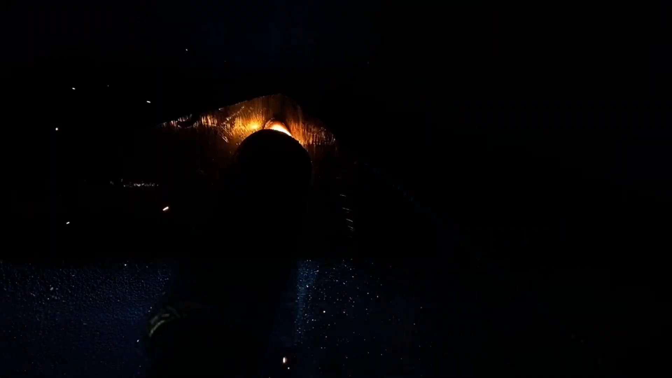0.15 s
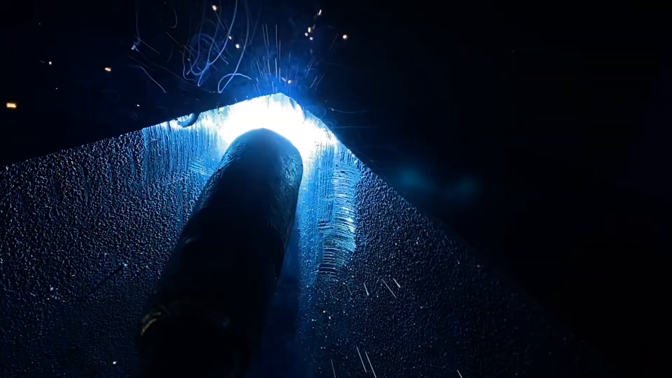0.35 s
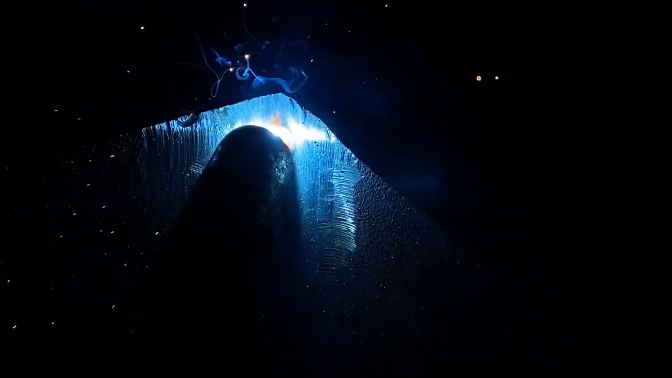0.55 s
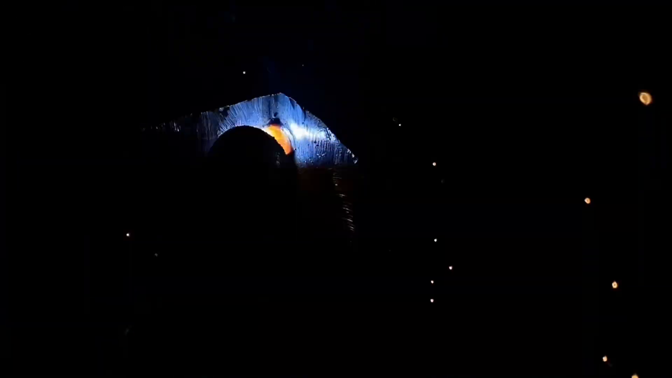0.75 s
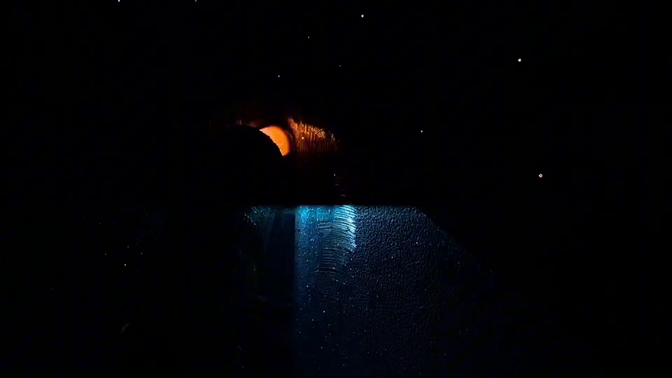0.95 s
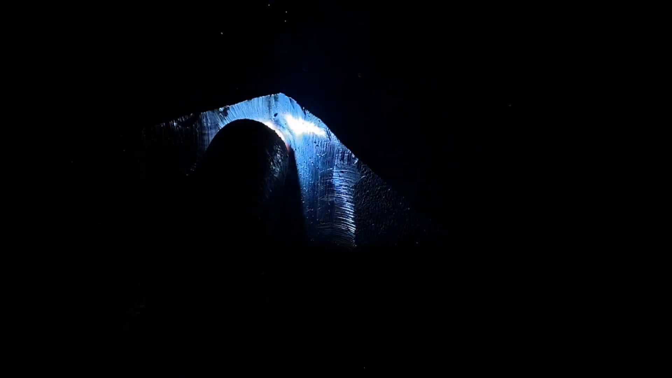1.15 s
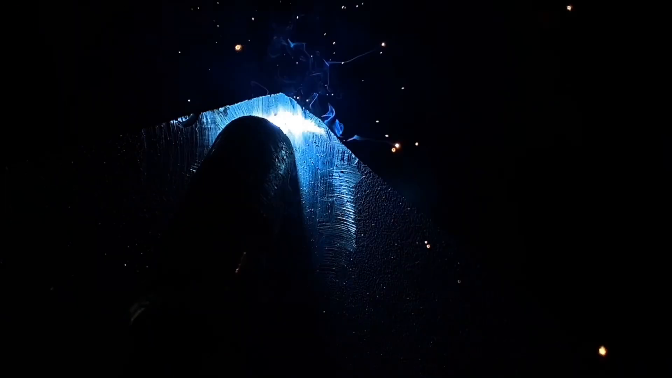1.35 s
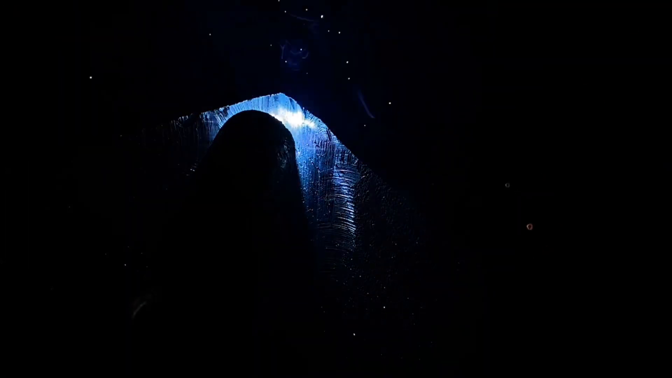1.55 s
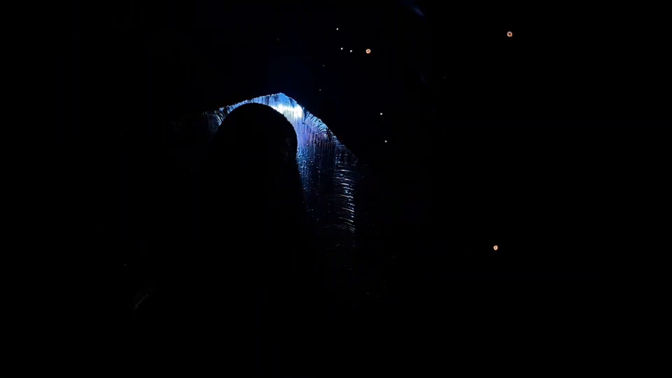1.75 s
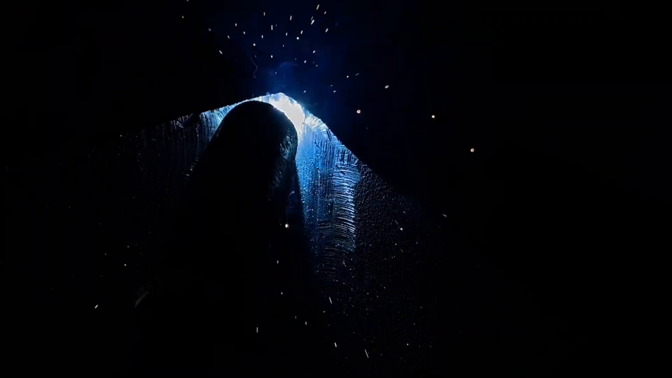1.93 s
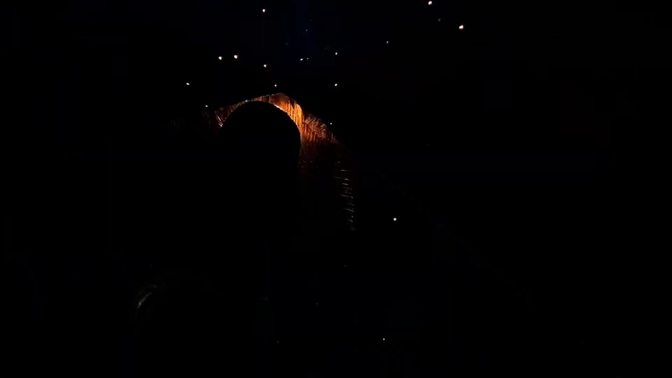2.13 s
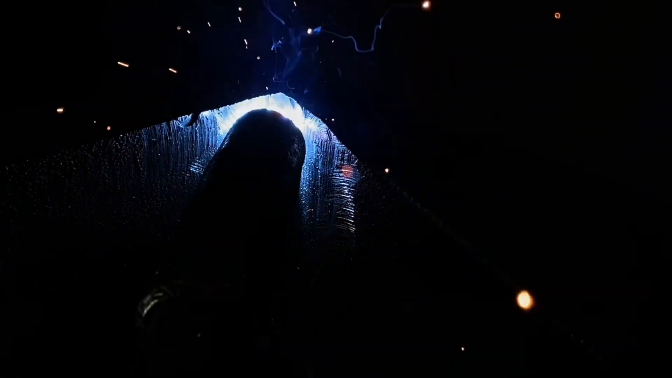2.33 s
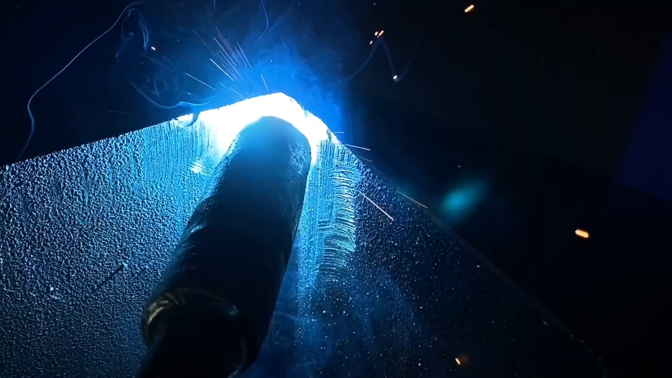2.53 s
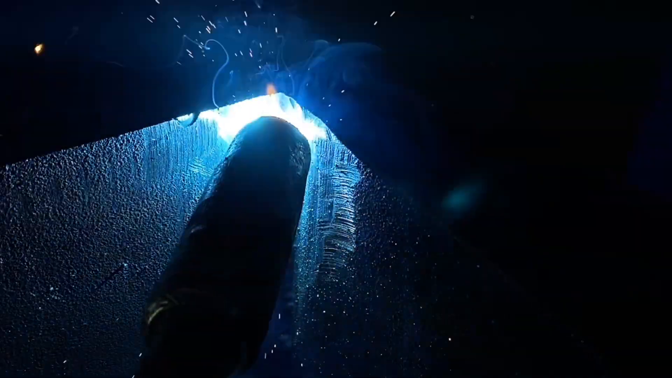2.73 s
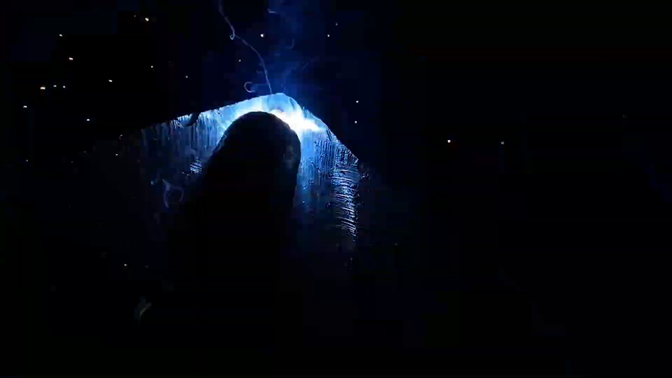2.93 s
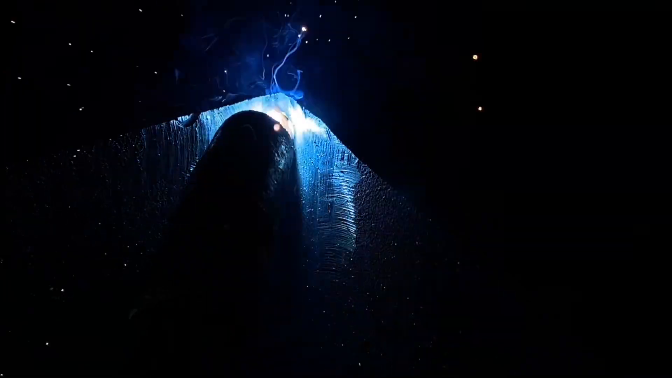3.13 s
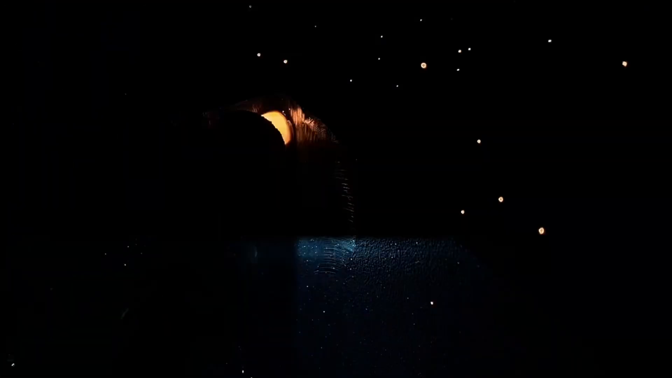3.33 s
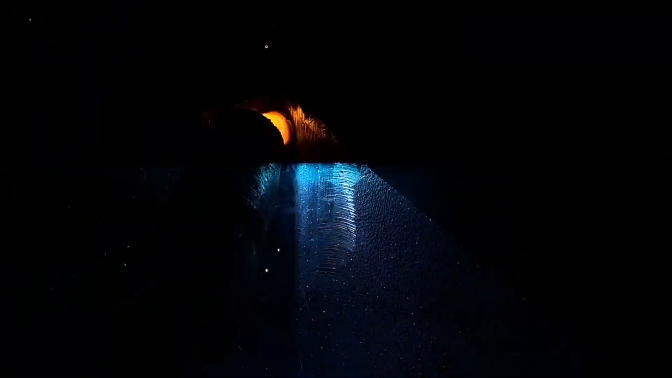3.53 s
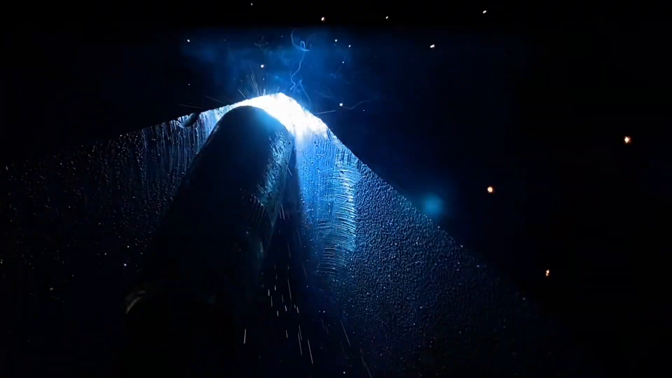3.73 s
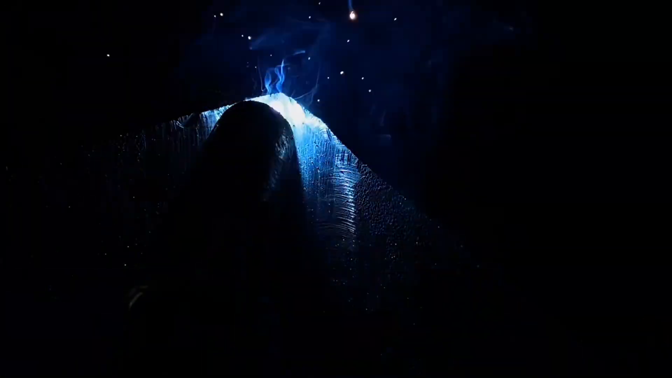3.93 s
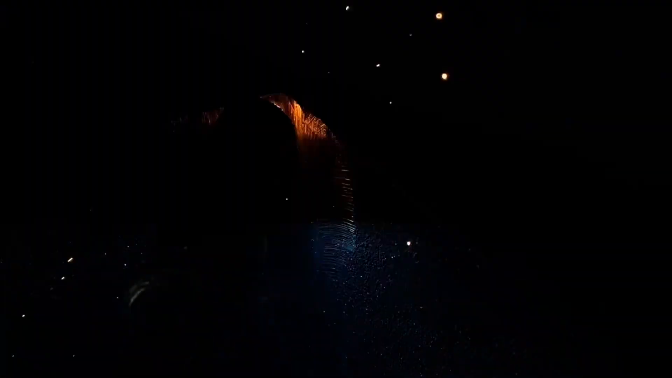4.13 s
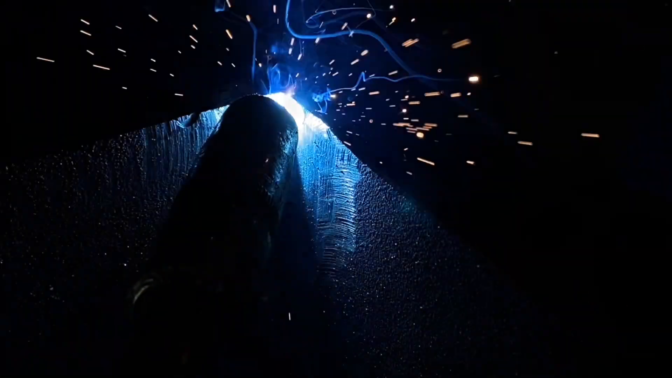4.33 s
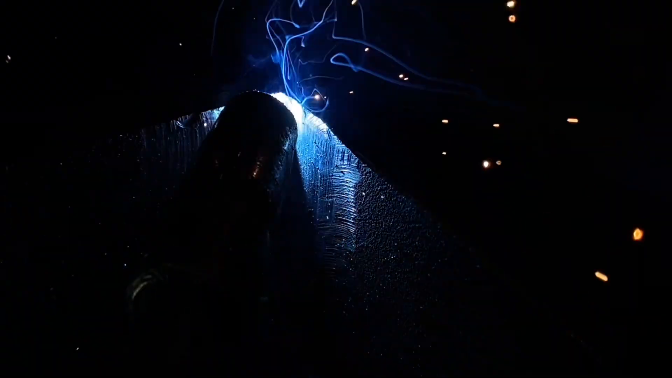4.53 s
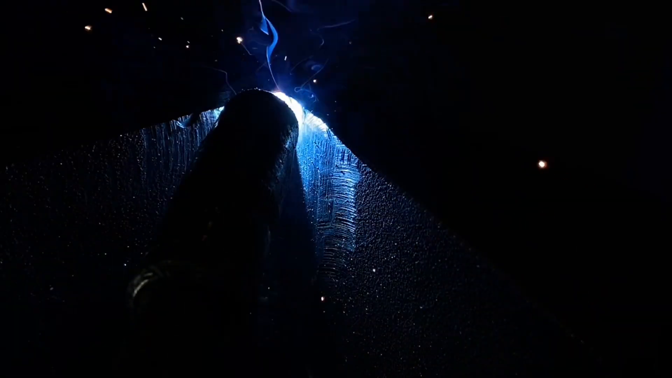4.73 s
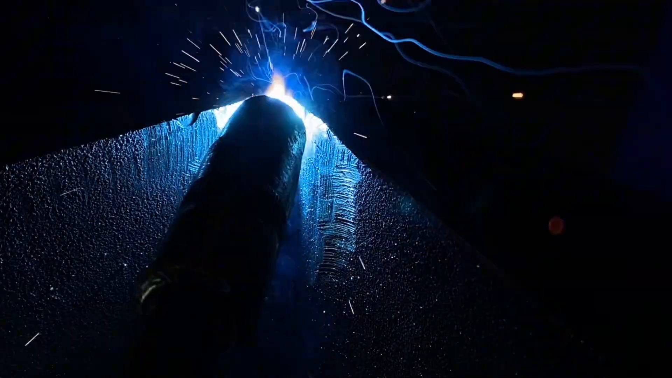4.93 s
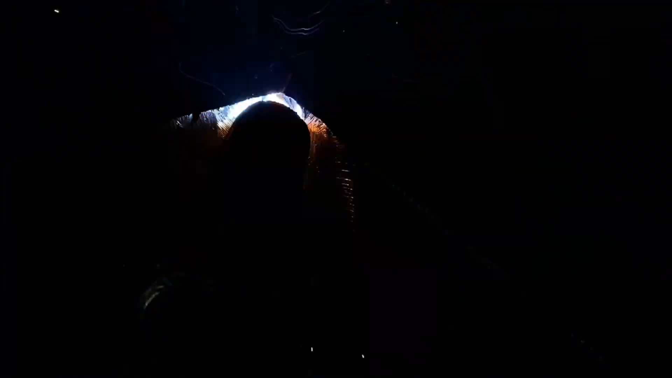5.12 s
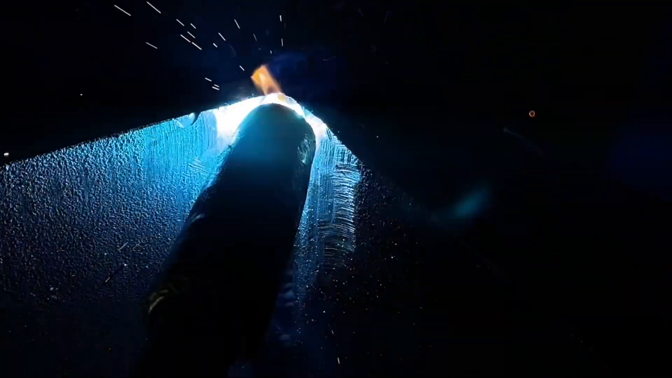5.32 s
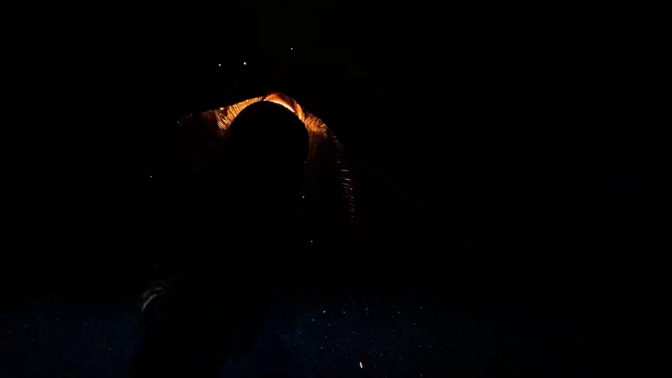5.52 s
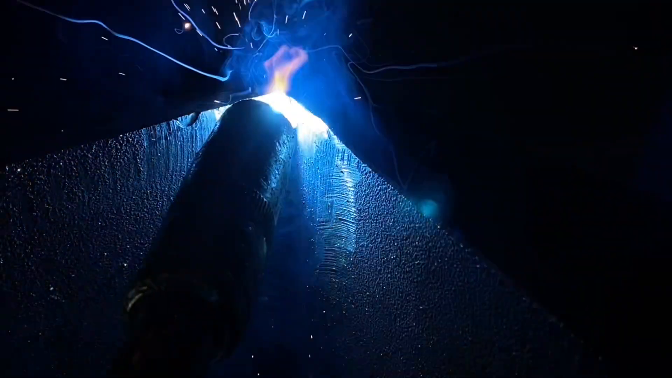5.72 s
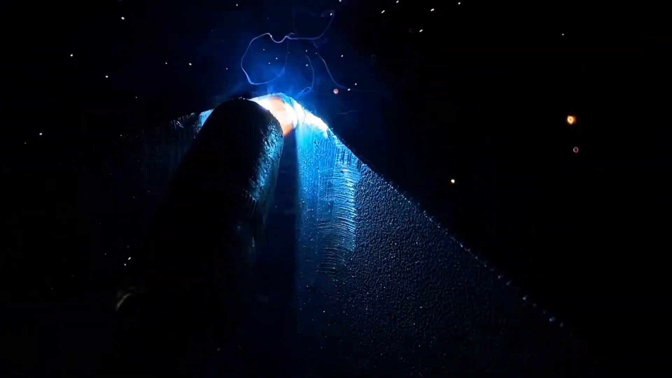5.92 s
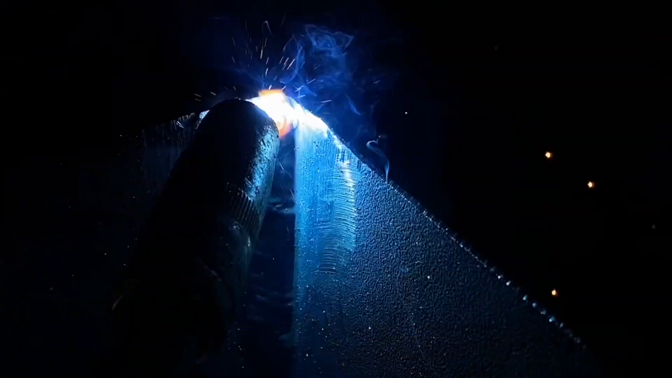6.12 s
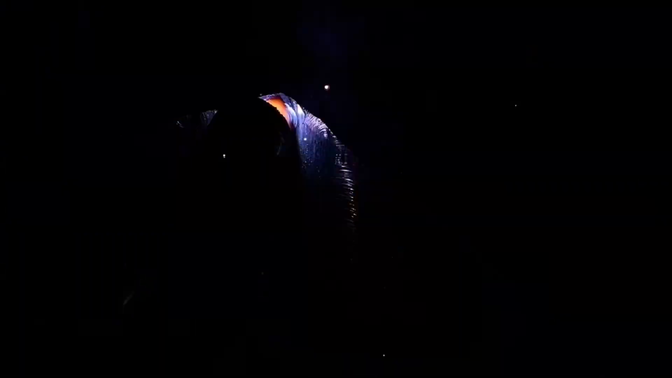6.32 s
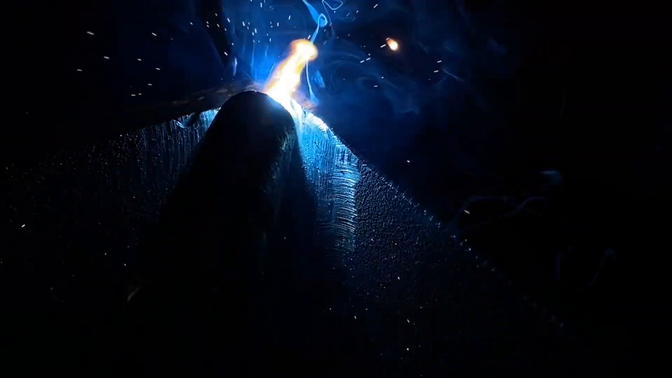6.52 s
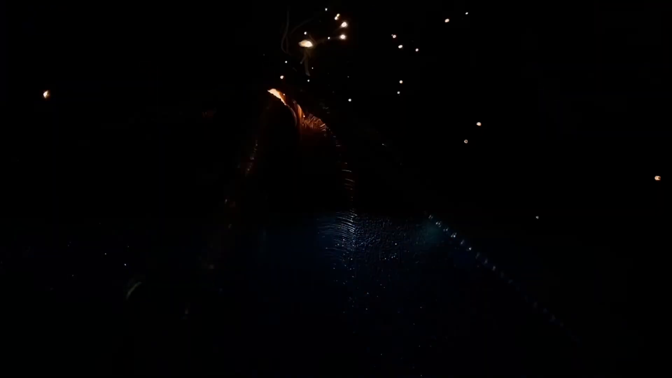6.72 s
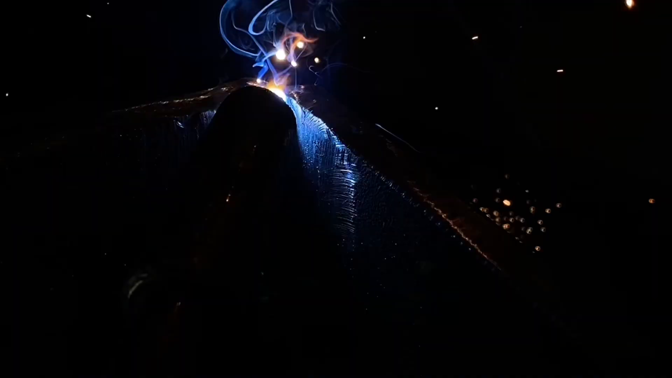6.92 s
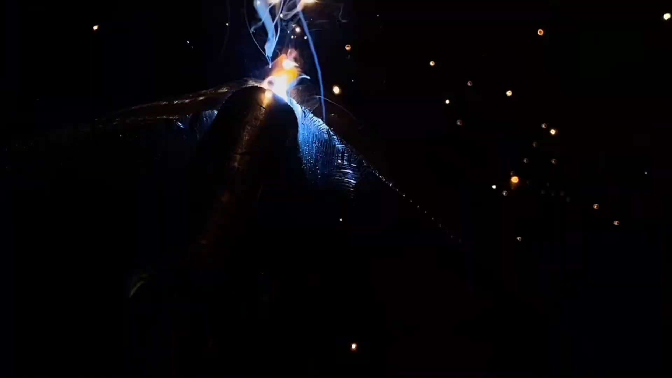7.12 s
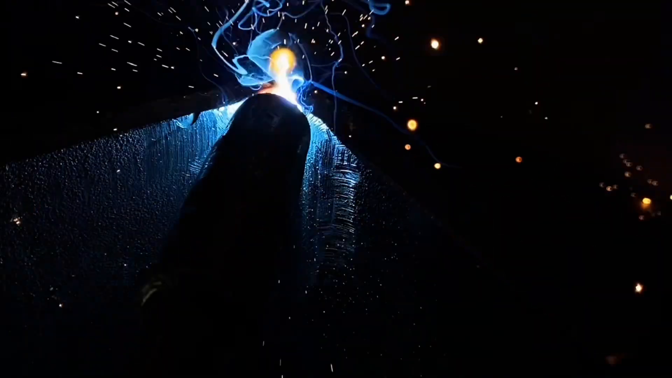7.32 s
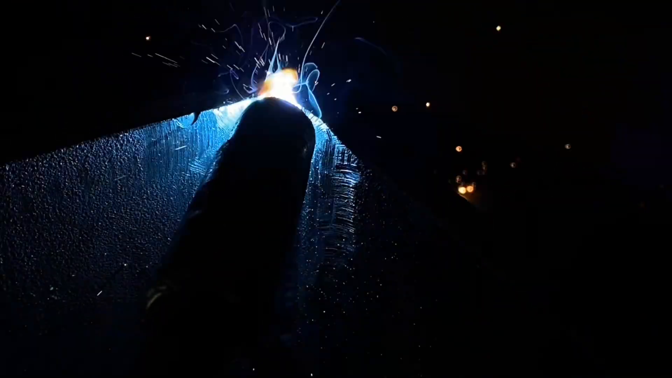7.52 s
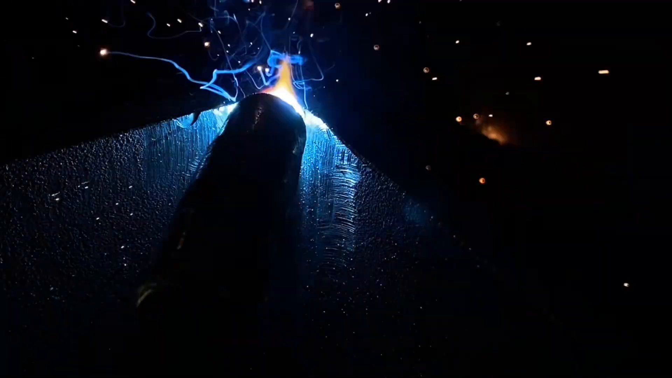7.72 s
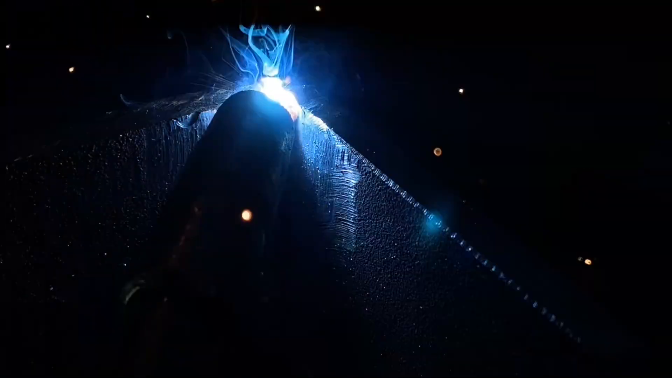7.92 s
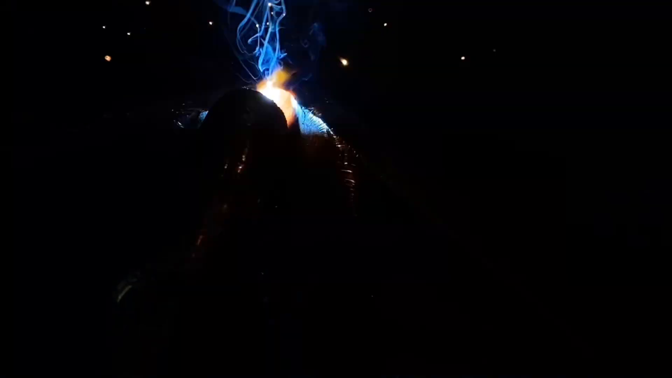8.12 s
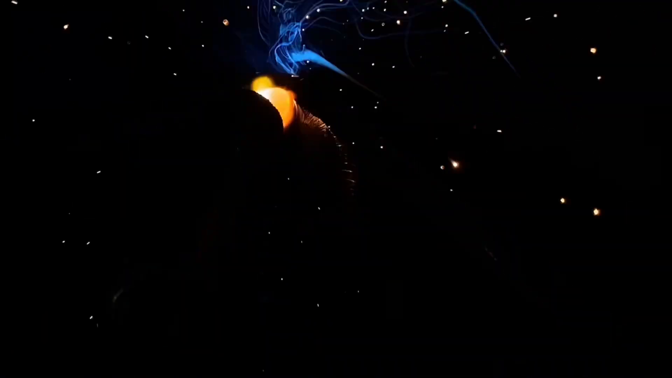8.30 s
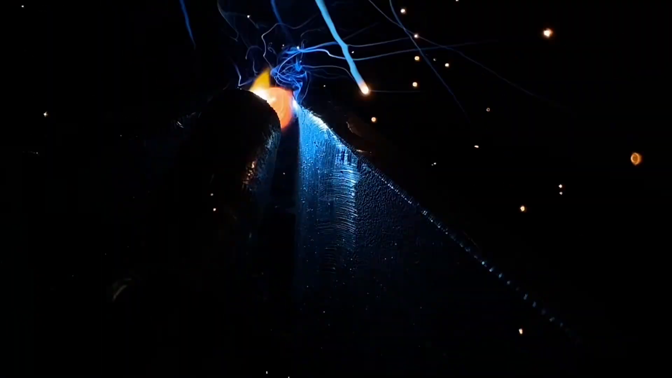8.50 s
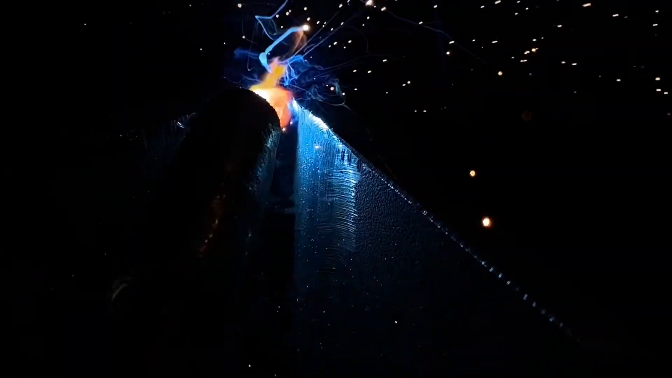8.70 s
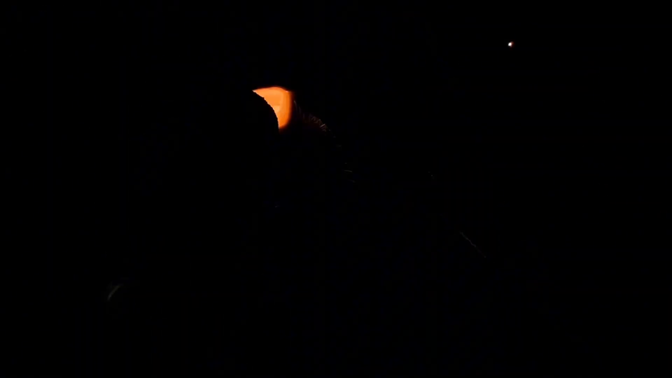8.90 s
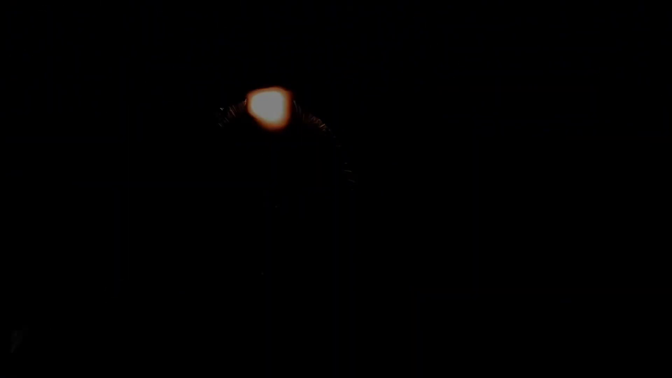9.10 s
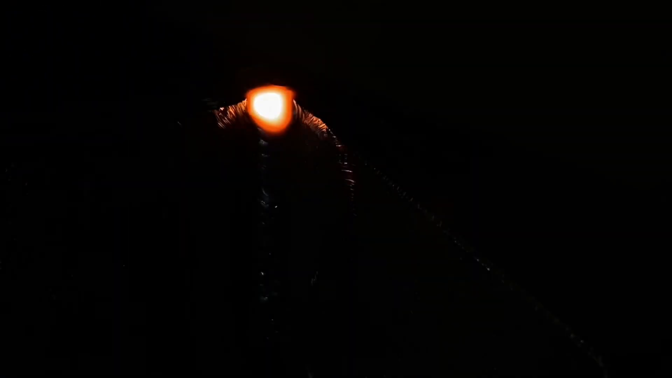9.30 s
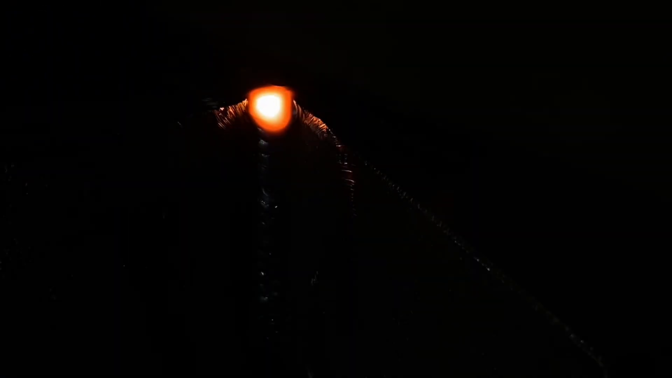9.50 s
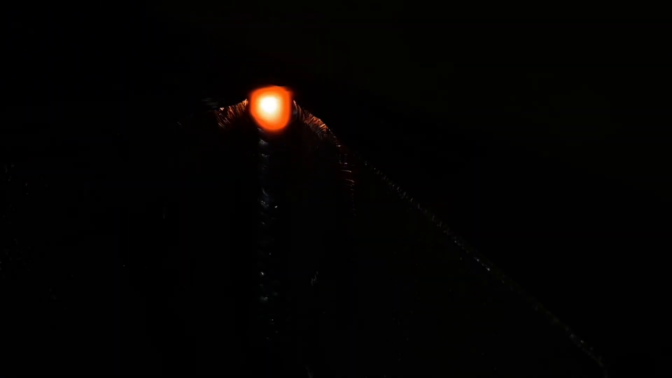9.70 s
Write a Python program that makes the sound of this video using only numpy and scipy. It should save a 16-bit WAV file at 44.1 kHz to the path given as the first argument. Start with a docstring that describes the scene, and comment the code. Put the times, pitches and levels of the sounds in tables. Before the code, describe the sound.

Close, steady crackling and hissing of wire-feed welding on steel, stopping suddenly near the end and leaving a faint workshop hum.

```python
"""Wire-feed welding on a steel joint, close by. About 65 times a second the wire shorts into the pool and the arc
strikes again with a sharp pop; between pops it sizzles. Nearby steel returns quick echoes, the workshop a short tail.
The arc drops out once, then stops with a last pop, leaving the murmur of the shop. A small stereo microphone pair."""
import sys
import numpy as np
from scipy import signal
from scipy.fft import rfft, irfft, next_fast_len
from scipy.io import wavfile

SR = 44100
rng = np.random.default_rng(int(sys.argv[2]) if len(sys.argv) > 2 else 0)


def store_pcm(level_fs):
    """Save levels as 16-bit WAV."""
    pcm = np.round(np.clip(level_fs, -1, 1) * 32767).astype(np.int16)
    wavfile.write(sys.argv[1], SR, np.atleast_2d(pcm).T)


N = 429975

# the arc striking again: (s, peak dB)
POPS = [(0.0129, -27.5), (0.0239, -30.2), (0.0366, -31.1), (0.0498, -29.2), (0.0676, -24.7), (0.0815, -30.2),
        (0.0945, -32.9), (0.0987, -24.5), (0.1116, -32.1), (0.124, -31.2), (0.1544, -30.0), (0.1761, -30.1),
        (0.1874, -26.6), (0.1946, -30.1), (0.2084, -28.7), (0.2216, -31.4), (0.2389, -28.5), (0.2446, -31.6),
        (0.2527, -24.6), (0.2713, -32.1), (0.2752, -18.7), (0.2915, -31.7), (0.3012, -27.0), (0.3068, -26.0),
        (0.3117, -27.6), (0.3234, -23.9), (0.333, -24.7), (0.3543, -30.2), (0.3662, -28.8), (0.3769, -24.6),
        (0.3883, -20.8), (0.3995, -21.6), (0.4311, -25.2), (0.4378, -23.6), (0.4504, -23.5), (0.4679, -24.4),
        (0.4751, -26.5), (0.4873, -20.9), (0.5066, -25.7), (0.5256, -18.8), (0.539, -24.0), (0.5482, -26.7),
        (0.5641, -25.9), (0.5754, -24.7), (0.5913, -27.9), (0.5965, -24.2), (0.602, -29.7), (0.6078, -24.3),
        (0.6206, -24.2), (0.6342, -25.3), (0.6378, -31.7), (0.6483, -24.2), (0.6661, -27.7), (0.68, -23.3),
        (0.6951, -25.1), (0.7064, -23.4), (0.7105, -25.2), (0.7225, -23.2), (0.7346, -24.3), (0.7551, -22.5),
        (0.7708, -23.5), (0.7751, -23.8), (0.7834, -23.9), (0.7992, -26.6), (0.8061, -25.2), (0.8183, -24.5),
        (0.8337, -24.9), (0.842, -31.7), (0.8476, -25.2), (0.8613, -24.0), (0.8737, -22.2), (0.8773, -27.1),
        (0.8882, -23.2), (0.9005, -25.4), (0.9149, -23.3), (0.9248, -27.9), (0.9321, -24.2), (0.9469, -24.5),
        (0.9582, -26.7), (0.9691, -21.7), (0.9867, -24.7), (0.9981, -23.8), (1.0017, -22.1), (1.0209, -25.5),
        (1.0362, -23.4), (1.0542, -22.1), (1.0714, -26.4), (1.0886, -22.6), (1.1054, -24.9), (1.122, -24.1),
        (1.1384, -22.1), (1.1541, -23.4), (1.1713, -26.5), (1.1866, -24.2), (1.2018, -25.3), (1.218, -24.7),
        (1.2337, -24.9), (1.2496, -26.7), (1.2656, -24.7), (1.282, -25.9), (1.2972, -26.3), (1.3138, -24.8),
        (1.3297, -23.4), (1.3453, -26.1), (1.3617, -28.5), (1.3778, -25.2), (1.394, -25.2), (1.4104, -25.1),
        (1.4266, -25.3), (1.4426, -25.7), (1.4583, -26.6), (1.4758, -22.2), (1.492, -28.0), (1.5093, -24.6),
        (1.5253, -25.9), (1.5418, -21.7), (1.5579, -25.0), (1.5749, -25.2), (1.5917, -25.7), (1.6076, -25.4),
        (1.6252, -24.4), (1.6417, -27.4), (1.658, -28.6), (1.674, -28.0), (1.6908, -28.5), (1.7068, -27.5),
        (1.7241, -30.0), (1.7398, -27.7), (1.7565, -26.4), (1.7727, -27.4), (1.7893, -30.0), (1.8058, -28.7),
        (1.8215, -30.2), (1.8378, -29.3), (1.8532, -31.0), (1.8686, -29.4), (1.8852, -28.4), (1.8999, -30.4),
        (1.9148, -27.6), (1.9309, -28.6), (1.9466, -26.9), (1.9649, -27.6), (1.9804, -29.1), (1.9961, -26.2),
        (2.0113, -25.6), (2.0272, -27.3), (2.0442, -29.8), (2.0615, -28.8), (2.0768, -27.7), (2.0928, -28.3),
        (2.1082, -29.8), (2.1241, -27.9), (2.1398, -28.7), (2.1556, -26.1), (2.1714, -26.8), (2.1878, -27.0),
        (2.2046, -25.0), (2.2205, -27.1), (2.2365, -29.1), (2.2511, -27.3), (2.2641, -26.2), (2.2762, -26.1),
        (2.2901, -24.2), (2.3035, -26.5), (2.3234, -28.4), (2.3392, -28.7), (2.3565, -26.9), (2.3723, -26.8),
        (2.391, -28.8), (2.4068, -25.3), (2.4246, -26.8), (2.4405, -24.6), (2.4497, -23.1), (2.4589, -25.5),
        (2.4696, -24.9), (2.478, -24.8), (2.4898, -24.6), (2.507, -28.0), (2.5232, -30.4), (2.54, -27.2),
        (2.5572, -24.6), (2.568, -24.5), (2.5822, -30.8), (2.5919, -31.4), (2.5959, -24.4), (2.6148, -23.0),
        (2.6297, -24.1), (2.6417, -30.7), (2.6571, -31.1), (2.6676, -27.5), (2.6782, -22.2), (2.6859, -24.6),
        (2.6897, -23.4), (2.7049, -25.3), (2.7205, -31.7), (2.7362, -29.7), (2.7522, -24.1), (2.7662, -31.6),
        (2.7832, -28.8), (2.8003, -28.6), (2.8165, -33.1), (2.831, -29.7), (2.8468, -26.9), (2.8601, -25.7),
        (2.8733, -24.4), (2.8857, -24.7), (2.9093, -23.3), (2.9241, -25.7), (2.9349, -23.8), (2.9394, -23.9),
        (2.9584, -27.1), (2.9739, -27.5), (2.9832, -27.4), (2.9918, -20.9), (3.0107, -22.8), (3.0281, -24.0),
        (3.0475, -21.4), (3.0613, -21.7), (3.0768, -24.6), (3.0852, -23.6), (3.09, -25.2), (3.1007, -23.2),
        (3.1143, -23.5), (3.1301, -24.8), (3.1499, -22.5), (3.1633, -24.6), (3.1778, -27.1), (3.1838, -25.6),
        (3.1924, -23.4), (3.1975, -21.4), (3.207, -23.5), (3.2109, -23.7), (3.2257, -23.4), (3.2416, -25.6),
        (3.2558, -26.6), (3.2593, -22.5), (3.2747, -24.8), (3.289, -25.0), (3.3066, -27.6), (3.3198, -25.4),
        (3.3332, -26.1), (3.3446, -25.0), (3.357, -24.6), (3.3714, -25.3), (3.3855, -23.1), (3.4001, -24.6),
        (3.4038, -23.2), (3.4148, -24.0), (3.4282, -24.2), (3.4422, -22.3), (3.4468, -23.6), (3.456, -23.2),
        (3.4696, -24.4), (3.4856, -23.8), (3.49, -27.3), (3.5059, -24.8), (3.5228, -25.9), (3.5376, -27.6),
        (3.552, -24.4), (3.5581, -26.6), (3.571, -22.9), (3.5778, -23.9), (3.5979, -24.6), (3.6112, -24.2),
        (3.6176, -25.6), (3.6378, -16.3), (3.659, -23.7), (3.6761, -21.0), (3.6902, -27.7), (3.7016, -20.2),
        (3.7149, -25.6), (3.7291, -26.0), (3.7429, -23.5), (3.7572, -25.8), (3.7702, -22.3), (3.775, -20.1),
        (3.7909, -21.2), (3.7989, -26.6), (3.803, -25.1), (3.8188, -20.1), (3.8375, -21.8), (3.8537, -21.9),
        (3.872, -22.9), (3.8886, -24.1), (3.9046, -27.2), (3.9198, -28.2), (3.9327, -27.1), (3.9478, -29.9),
        (3.961, -26.9), (3.9775, -25.7), (3.9936, -28.0), (4.0105, -24.9), (4.0293, -25.7), (4.0465, -25.3),
        (4.0654, -27.2), (4.0717, -20.9), (4.0907, -25.7), (4.1033, -26.7), (4.1207, -30.0), (4.1273, -28.1),
        (4.1344, -21.4), (4.143, -22.6), (4.1579, -24.8), (4.172, -27.0), (4.1914, -26.7), (4.2069, -29.9),
        (4.2226, -27.3), (4.2307, -27.8), (4.2439, -26.8), (4.259, -27.0), (4.2806, -24.8), (4.2956, -25.9),
        (4.3157, -26.5), (4.331, -25.0), (4.351, -26.9), (4.3666, -24.8), (4.3868, -21.1), (4.402, -28.2),
        (4.4207, -26.1), (4.4363, -26.6), (4.4549, -27.8), (4.4712, -26.9), (4.4893, -26.6), (4.5062, -24.7),
        (4.5236, -24.9), (4.5412, -27.4), (4.5584, -26.4), (4.5762, -27.3), (4.5933, -25.3), (4.6116, -28.0),
        (4.6277, -27.8), (4.6455, -28.2), (4.662, -27.4), (4.6789, -27.8), (4.6956, -27.0), (4.7119, -28.2),
        (4.728, -28.6), (4.7438, -31.1), (4.7608, -26.3), (4.778, -27.0), (4.7954, -27.5), (4.8126, -27.0),
        (4.8299, -24.1), (4.8471, -24.8), (4.8547, -31.8), (4.8623, -27.1), (4.8738, -25.2), (4.8818, -27.6),
        (4.8874, -23.4), (4.9004, -22.4), (4.9165, -24.0), (4.9369, -23.1), (4.9541, -24.6), (4.9688, -26.1),
        (4.9847, -25.6), (5.0022, -25.4), (5.0222, -19.1), (5.0422, -23.7), (5.0612, -25.4), (5.0776, -23.8),
        (5.0938, -25.7), (5.111, -26.9), (5.1267, -25.2), (5.1409, -23.5), (5.151, -26.0), (5.1645, -24.4),
        (5.1772, -22.9), (5.1952, -21.1), (5.2098, -23.6), (5.2254, -29.4), (5.2321, -24.5), (5.2454, -25.6),
        (5.2581, -25.9), (5.263, -23.5), (5.2752, -27.1), (5.2866, -32.4), (5.2914, -30.2), (5.307, -29.4),
        (5.3182, -28.0), (5.3351, -30.2), (5.3387, -21.1), (5.3495, -30.3), (5.3531, -30.6), (5.3651, -29.8),
        (5.3789, -28.5), (5.392, -26.9), (5.4061, -28.6), (5.4189, -29.3), (5.4237, -26.3), (5.4344, -32.2),
        (5.4642, -27.7), (5.482, -31.0), (5.4972, -33.0), (5.5022, -25.0), (5.5198, -22.8), (5.5252, -31.6),
        (5.5411, -28.3), (5.5576, -25.6), (5.5694, -24.8), (5.5829, -25.7), (5.5871, -24.3), (5.5966, -20.9),
        (5.6114, -22.8), (5.6266, -17.7), (5.6424, -23.4), (5.6613, -19.2), (5.6826, -22.2), (5.7032, -22.5),
        (5.7121, -30.4), (5.7184, -27.1), (5.723, -25.4), (5.7346, -26.0), (5.7539, -23.1), (5.767, -21.5),
        (5.7846, -21.8), (5.7893, -30.3), (5.7966, -21.9), (5.8156, -22.8), (5.8214, -27.4), (5.8344, -23.1),
        (5.8509, -27.5), (5.8657, -26.9), (5.8811, -27.6), (5.8938, -27.5), (5.9056, -28.2), (5.9188, -26.1),
        (5.9312, -26.7), (5.9434, -24.6), (5.957, -29.0), (5.9718, -27.8), (5.9854, -26.3), (5.998, -26.0),
        (6.0068, -26.2), (6.0104, -28.7), (6.0247, -26.7), (6.0382, -26.5), (6.0499, -25.2), (6.0599, -27.9),
        (6.0744, -22.4), (6.0827, -30.5), (6.093, -24.7), (6.0974, -26.8), (6.1115, -23.1), (6.1251, -27.9),
        (6.1382, -23.0), (6.1437, -21.4), (6.1619, -22.6), (6.1759, -28.7), (6.1805, -27.0), (6.1923, -24.3),
        (6.2093, -26.5), (6.2161, -24.0), (6.2226, -25.0), (6.2342, -25.8), (6.2524, -21.2), (6.2581, -24.6),
        (6.2683, -21.7), (6.2898, -20.3), (6.2969, -24.3), (6.3607, -27.2), (6.3711, -25.0), (6.3817, -23.0),
        (6.3923, -23.9), (6.4029, -25.5), (6.4207, -27.7), (6.4325, -27.0), (6.4505, -25.7), (6.4592, -27.8),
        (6.4713, -22.9), (6.4917, -24.1), (6.5197, -26.5), (6.5365, -26.2), (6.5537, -22.1), (6.5688, -22.9),
        (6.5886, -24.7), (6.6003, -16.5), (6.6223, -26.4), (6.6413, -24.8), (6.6597, -26.6), (6.6669, -29.7),
        (6.6765, -28.2), (6.6952, -25.4), (6.7066, -28.9), (6.7266, -22.0), (6.7408, -20.6), (6.7636, -22.8),
        (6.7778, -21.5), (6.7985, -24.9), (6.8064, -29.7), (6.8154, -28.3), (6.8364, -21.0), (6.8489, -22.4),
        (6.8717, -20.9), (6.881, -23.0), (6.9039, -26.5), (6.9128, -29.3), (6.9269, -24.1), (6.947, -26.5),
        (6.9557, -22.9), (6.9732, -27.3), (6.9878, -24.5), (6.9981, -23.1), (7.0143, -23.0), (7.0268, -20.3),
        (7.0425, -24.8), (7.0537, -26.5), (7.0772, -21.1), (7.0887, -22.3), (7.101, -23.5), (7.1195, -22.8),
        (7.1308, -22.3), (7.1435, -16.9), (7.1471, -31.4), (7.171, -24.1), (7.2014, -20.5), (7.2168, -21.7),
        (7.2308, -22.1), (7.2426, -26.6), (7.2537, -26.3), (7.2653, -29.2), (7.2769, -29.9), (7.2881, -28.1),
        (7.3006, -28.6), (7.3123, -27.9), (7.325, -24.4), (7.3368, -26.7), (7.3499, -24.5), (7.3622, -25.5),
        (7.3758, -26.1), (7.3877, -25.7), (7.4028, -25.8), (7.4199, -28.8), (7.4352, -25.0), (7.4504, -25.5),
        (7.466, -26.7), (7.4817, -24.2), (7.4967, -23.9), (7.5116, -24.3), (7.5243, -27.8), (7.5386, -30.4),
        (7.5517, -24.6), (7.5675, -25.8), (7.5834, -27.0), (7.589, -28.8), (7.6072, -27.8), (7.6173, -31.2),
        (7.6364, -22.2), (7.6494, -27.6), (7.6611, -24.6), (7.6803, -27.4), (7.6917, -29.2), (7.7151, -25.2),
        (7.7329, -26.5), (7.7475, -25.7), (7.7606, -28.4), (7.7745, -24.7), (7.7882, -23.3), (7.8029, -20.7),
        (7.8171, -24.0), (7.8325, -25.4), (7.8483, -26.6), (7.8629, -24.9), (7.8783, -25.1), (7.8936, -27.9),
        (7.9092, -26.4), (7.9247, -29.5), (7.9405, -26.8), (7.955, -25.1), (7.9723, -24.1), (7.9889, -26.6),
        (8.0056, -26.1), (8.0223, -25.9), (8.0354, -27.8), (8.0455, -32.4), (8.0578, -28.9), (8.0742, -31.7),
        (8.0892, -29.0), (8.1029, -22.4), (8.1168, -24.6), (8.1307, -23.8), (8.1442, -23.2), (8.1589, -28.3),
        (8.1745, -22.9), (8.1886, -24.1), (8.2035, -25.0), (8.2189, -25.3), (8.2341, -25.2), (8.2489, -25.3),
        (8.2637, -24.8), (8.2807, -24.0), (8.2963, -24.7), (8.3114, -27.6), (8.3288, -22.7), (8.3352, -31.5),
        (8.3438, -25.4), (8.3548, -25.1), (8.3796, -27.6), (8.3905, -26.6), (8.4016, -23.3), (8.4137, -26.7),
        (8.4245, -26.5), (8.4388, -28.8), (8.4507, -29.6), (8.462, -27.3), (8.477, -28.6), (8.4906, -26.3),
        (8.504, -25.6), (8.5183, -26.7), (8.5311, -28.1), (8.5468, -29.0), (8.5622, -26.6), (8.5789, -27.1),
        (8.6049, -25.8), (8.6177, -28.3), (8.6325, -26.7), (8.6403, -27.5), (8.6457, -26.3), (8.6497, -24.0),
        (8.6637, -24.9), (8.6786, -26.5), (8.6869, -25.4), (8.7028, -23.8), (8.7174, -23.5), (8.722, -26.9),
        (8.7364, -23.5), (8.7523, -27.4), (8.7619, -29.6), (8.7748, -28.3), (8.7927, -27.1), (8.882, -21.4)]   # fixed
# the burning arc between pops: (s, sizzle dB)
ARC = [(0.0, -29), (0.64, -30), (1.86, -34.5), (2.84, -31.5), (4.24, -31), (4.58, -35), (5.91, -31.5), (6.91, -32.5),
       (7.11, -34.5), (8.55, -30.5), (8.65, -30), (8.7, -28), (8.8, -60)]
# the shop: (s, murmur dB, low rumble dB)
SHOP = [(0.0, -55.5, -72), (0.87, -57.5, -73), (1.41, -57.5, -53.5), (1.47, -55.5, -71), (3.56, -55.5, -72), (3.72, -52, -56),
        (4.8, -55.5, -79), (5.67, -50.5, -64), (6.54, -55, -68), (6.57, -53.5, -62), (7.68, -51, -67), (8.61, -58, -72),
        (9.37, -55.5, -69), (9.75, -54.5, -75)]
# echoes off the work piece: (delay at the start ms, delay at the end ms, dB); the torch travels along the joint
ECHOES = [(.84, .84, 16.5), (1.6, 1.652, 7), (2.2, 2.2, -0.5), (2.9, 2.3, 0.5)]
# colours at the left microphone: (Hz, dB per Hz)
POP_COLOUR = [(150, -32), (450, -19), (800, -13.5), (1250, 1), (1700, 0.5), (2000, -6.5), (2400, -4), (3200, -9),
              (4000, 2), (5300, -5.5), (7600, -4), (9500, -18), (11200, 4.5), (12600, -21), (13500, -3), (15500, -5)]
SIZZLE_COLOUR = [(500, -34.5), (1300, -10), (3000, -11.5), (4000, -4.5), (7600, -6), (11200, 2.5), (13400, 1.5), (15500, 0)]
MURMUR_COLOUR = [(53, -38.5), (90, -12.5), (119, -5.5), (172, -10.5), (200, -8.5), (265, -7.5), (337, -6), (392, -7.5),
                 (519, -8.5), (658, -5), (817, -14), (3190, -23.5), (15800, -40)]
# right microphone against left: (Hz, right dB, share of reflected sound that both hear alike)
PAIR = [(250, 0, 1), (450, 3.5, 0.97), (795, -3.5, 0.71), (1300, -6, 0.74), (2650, -0.5, 0.59), (4000, -4.5, 0.59), (6900, -1, 0.74),
        (15000, 0, 0.64)]
SCATTER_DB, SCATTER_T60_S = -7, 0.021   # dense reflections off bench and clamps
ROOM_DB, ROOM_T60_S = -28, 0.22
CUTOFF_HZ = 15900   # fixed
SIZE = next_fast_len(N + 8192)   # fixed
HZ = np.maximum(np.fft.rfftfreq(SIZE, 1 / SR), 1)
# the arc is out: (from s, to s, sizzle drop dB)
OUTAGES = [(6.302, 6.357, -15), (8.797, 8.88, -18), (8.886, 9.75, -50)]
RIGHT_LATE_MS, RIGHT_EARLY_MS, SWAP_HZ, IN_PHASE_HZ = .07, .241, 5600, 11125   # fixed: right lags in the mids, leads in the treble
# small objects scatter treble best: (Hz, dB)
SCATTER_COLOUR = [(500, -4), (1500, -10), (5000, 2), (11000, -2.5)]


def from_db(db):
    """Decibels to gain."""
    return 10 ** (np.asarray(db) / 20)


def rms_one(x):
    """Scales to rms 1."""
    return x / np.sqrt(np.mean(x ** 2) + 1e-20)


def in_time(rows):
    """Columns of a curve table, one value per sample."""
    s, *columns = np.transpose(rows)
    return [np.interp(np.arange(N) / SR, s, c) for c in columns]


def at_hz(points, column=1):
    """One column of a table by frequency, read on the FFT grid."""
    return np.interp(np.log(HZ), np.log(np.array(points)[:, 0]), np.array(points)[:, column])


def colour(x, spectrum):
    """Causal (minimum-phase) filter with the given spectrum, by folding the cepstrum."""
    cepstrum = irfft(np.log(from_db(at_hz(spectrum))), SIZE)
    cepstrum[1:SIZE // 2] *= 2
    cepstrum[SIZE // 2 + 1:] = 0
    return irfft(rfft(x, SIZE) * np.exp(rfft(cepstrum)), SIZE)[..., :N]


def drift(rate):
    """Slow chance of spread 1."""
    r = np.exp(-2 * np.pi * rate / SR)
    return rms_one(signal.lfilter([1], [1, -2 * r, r * r], rng.standard_normal(N + SR))[SR:])


def pops():
    """Each strike is one pressure click; its treble edge is sharper or blunter by chance."""
    s, peak_db = np.transpose(POPS)
    at = np.round((s - ECHOES[0][0] / 1000) * SR).astype(int)   # the first echo is the loudest arrival
    clicks, edges = np.zeros((2, N))
    clicks[at] = from_db(peak_db + 9.5)
    edges[at] = clicks[at] * (from_db(rng.normal(0, 2.2, len(at))) - 1)
    return clicks + signal.sosfilt(signal.butter(2, 6000, "high", fs=SR, output="sos"), edges + 1e-18)


def sizzle():
    """Tiny spits of the arc root and spatter, in clumps, over the hiss of the gas."""
    t, level_db = np.arange(N) / SR, in_time(ARC)[0] - 11
    for start, end, drop_db in OUTAGES:
        level_db = level_db + drop_db * np.clip((t - start) / .008, 0, 1) * (t < end)
    sizes = from_db(4.7 * np.minimum(rng.exponential(1, N), 5)) * rng.choice([-1, 1], N)
    spits = sizes * (rng.random(N) < 3000 * from_db(4.0 * drift(60)) / SR)
    hiss = from_db(-17 + 2.9 * drift(35)) * rng.standard_normal(N)
    return from_db(level_db) * rms_one(rms_one(spits) + hiss)


def echoes(x):
    """The direct sound and its copies off the steel."""
    out, n = x.copy(), np.arange(N)
    for start_ms, end_ms, db in ECHOES:
        lag = np.round(np.linspace(start_ms, end_ms, N) * SR / 1000).astype(int)
        out += from_db(db) * x[np.maximum(n - lag, 0)]
    return out


def reflections(x, db, t60):
    """Countless small reflections, never twice alike: two noises under the dying power of the source."""
    power = signal.lfilter([1], [1, -from_db(-120 / (t60 * SR))], x ** 2 + 1e-18)
    return from_db(db) * np.sqrt(power) * rng.standard_normal((2, N))


def scattered(x, spectrum):
    """A source at the microphones: direct sound with echoes, then two unlike diffuse tails."""
    late = np.roll(x, round(.0011 * SR))   # the dense reflections set in after the main arrival
    tails = colour(reflections(late, SCATTER_DB, SCATTER_T60_S), SCATTER_COLOUR)
    tails += reflections(late, ROOM_DB, ROOM_T60_S)
    return colour(np.vstack([echoes(x), tails]), spectrum)


def pair(direct, diffuse):
    """Left and right: level and arrival time differ by frequency; part of the diffuse sound is unlike."""
    alike = np.clip(at_hz(PAIR, column=2), 0, 1)
    treble = 1 / (1 + (SWAP_HZ / HZ) ** 12)
    turn = 2j * np.pi * HZ / 1000
    shift = (1 - treble) * np.exp(-turn * RIGHT_LATE_MS) + treble * np.exp(turn * (1 - IN_PHASE_HZ / HZ) * RIGHT_EARLY_MS)
    mid = rfft(direct, SIZE) + np.sqrt((1 + alike) / 2) * rfft(diffuse[0], SIZE)
    side = np.sqrt((1 - alike) / 2) * rfft(diffuse[1], SIZE)
    return irfft([mid + side, from_db(at_hz(PAIR)) * (shift * mid - side)], SIZE)[:, :N]


def shop():
    """Murmur of fans and machines, and a lumpy rumble under it."""
    murmur_db, rumble_db = in_time(SHOP)
    murmur = rms_one(colour(rng.standard_normal((2, N)), MURMUR_COLOUR))
    rumble = signal.sosfilt(signal.butter(2, [38, 90], "band", fs=SR, output="sos"), rng.standard_normal(N))
    return from_db(murmur_db + 2.5 + .8 * drift(9)) * murmur, from_db(rumble_db) * rms_one(rumble)


def scene():
    """Arc, echoes, room and shop at the two microphones."""
    arc = scattered(pops(), POP_COLOUR) + scattered(sizzle(), SIZZLE_COLOUR)
    murmur, rumble = shop()
    return pair(arc[0] + rumble, arc[1:] + murmur)


def record(dry):
    """The top is cut."""
    return signal.sosfilt(signal.cheby2(14, 60, CUTOFF_HZ * 1.04, fs=SR, output="sos"), dry)   # fixed


dry = scene()
out = record(dry)
store_pcm(out)
```